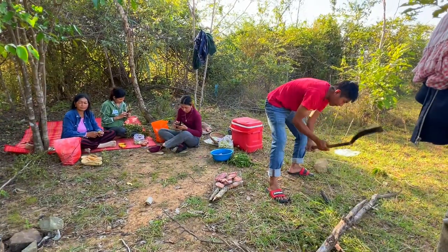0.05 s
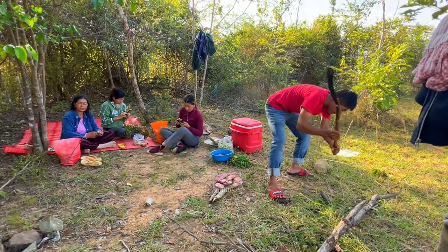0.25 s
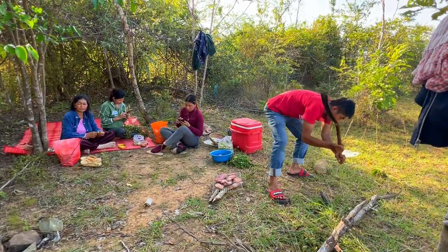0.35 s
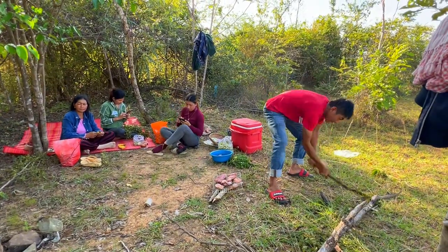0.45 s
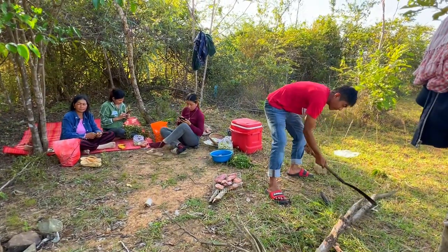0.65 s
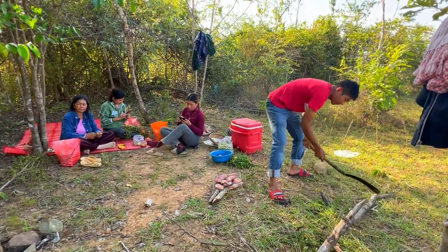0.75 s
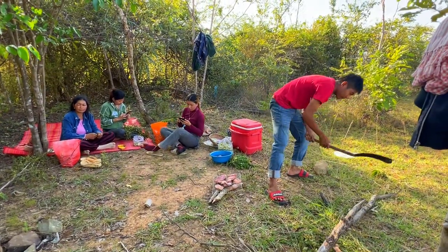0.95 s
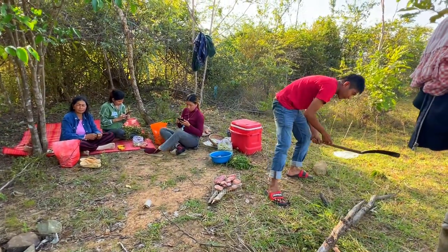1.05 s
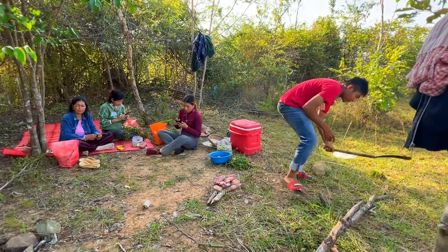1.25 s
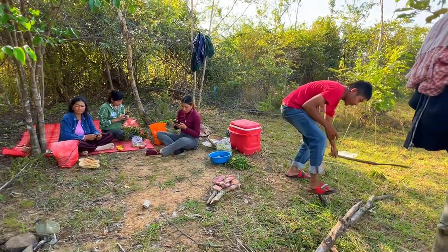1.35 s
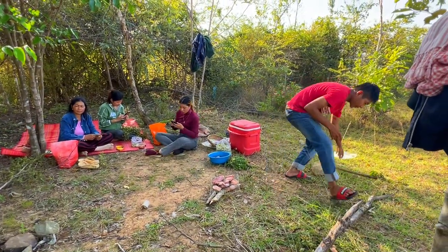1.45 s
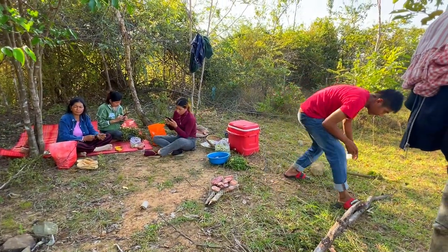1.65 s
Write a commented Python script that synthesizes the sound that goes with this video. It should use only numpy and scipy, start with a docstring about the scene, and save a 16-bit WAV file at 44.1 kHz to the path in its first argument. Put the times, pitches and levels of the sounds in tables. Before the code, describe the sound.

One hard blade chop splits dry wood on the ground, followed by crackling twigs and soft knocks

```python
"""Forest floor: a machete chops once into a dry branch, which cracks, splinters and thumps the ground.
The blade is worked free, twigs snap in the leaf litter, and a foot steps up and knocks the wood.
Behind are a low wind rumble, faint hiss and thin, high insect chirps.
Wood, blade and ground are damped sines; tearing, leaves and wind are coloured noise; chirps are
noise-modulated tones."""
import sys
import numpy as np
from scipy import signal
from scipy.fft import rfft, irfft, next_fast_len
from scipy.io import wavfile

SR = 44100
rng = np.random.default_rng(int(sys.argv[2]) if len(sys.argv) > 2 else 0)


def store_wav(level_fs):
    """Save 16-bit WAV to argv[1]."""
    pcm = np.round(np.clip(np.atleast_2d(level_fs), -1, 1) * 32767)
    wavfile.write(sys.argv[1], SR, pcm.T.astype(np.int16))


N = 74970


def amp(db):
    """Decibels to gain."""
    return 10 ** (np.asarray(db) / 20)


def unit(x):
    """Scale to rms 1."""
    return x / np.sqrt(np.mean(x ** 2) + 1e-20)


def along(points, hz):
    """Interpolate (Hz, value) points on a log frequency axis."""
    point_hz, value = np.transpose(points)
    return np.interp(np.log(hz + 1), np.log(point_hz + 1), value)


def curve(rows):
    """(s, value) rows to one value per sample."""
    return np.interp(np.arange(N) / SR, *np.transpose(rows))


def since(start_s):
    """Seconds since start_s, zero before."""
    return np.maximum(np.arange(N) / SR - start_s, 0)


def fade(t, t60_s, rise_s):
    """Quick rise, exponential decay."""
    return np.exp(-np.log(1000) * t / t60_s) * (1 - np.exp(-t / rise_s))


def filtered(x, response):
    """Multiply the spectrum of x by a function of frequency."""
    size = next_fast_len(N + SR // 4)
    hz = np.fft.rfftfreq(size, 1 / SR)
    return irfft(rfft(x, size) * response(hz), size)[..., :N]


# left-right likeness of noise: freq_hz, correlation
LIKENESS = [(300, .99), (700, .96), (2000, .7), (4000, .5), (8000, .3), (14000, .1)]


def noise(spectrum, grain_db=0):
    """Coloured stereo noise of rms 1; grain_db clumps it into grains under a millisecond long."""
    grains = amp(grain_db * np.repeat(rng.standard_normal(N // 20 + 1), 20)[:N])

    def mid_side_response(hz):
        angle = np.arccos(np.clip(along(LIKENESS, hz), -1, 1)) / 2
        return amp(along(spectrum, hz)) * [np.cos(angle), np.sin(angle)]

    mid, side = filtered(rng.standard_normal((2, N)) * grains, mid_side_response)
    return unit(np.array([mid + side, mid - side]))


def ring(start_s, modes, rise_s):
    """Damped modes (pitch_hz, level_db, t60_s) struck at start_s, cut off after 0.25 s."""
    out, start = np.zeros(N), int(start_s * SR)
    t = since(start_s)[start:start + SR // 4]
    out[start:start + len(t)] = sum(
        amp(db) * fade(t, t60_s, rise_s) * np.sin(2 * np.pi * hz * t) for hz, db, t60_s in modes)
    return out


# wind rumble level: time_s, level_db
WIND_LEVEL = [(0, -43), (.07, -44.5), (.13, -60.5), (.2, -54), (.27, -49.5), (.34, -68), (.39, -53.5),
              (.43, -44), (.52, -61.5), (.61, -55.5), (.67, -63), (.8, -58.5), (.87, -44.5), (.95, -48),
              (1.03, -56), (1.12, -58), (1.17, -46.5), (1.25, -44.5), (1.33, -59.5), (1.42, -43),
              (1.47, -49), (1.53, -44.5), (1.62, -51.5), (1.7, -58.5)]
# wind rumble colour: freq_hz, relative_db
RUMBLE_COLOUR = [(20, -26), (38, -20), (52, -1.5), (62, 1.5), (76, -10.5), (105, -20), (140, -32),
                 (250, -36), (600, -58.5), (2000, -94.5)]
# steady upper rumble colour: freq_hz, relative_db
BUFFET_COLOUR = [(30, -39), (80, -12.5), (105, 1.5), (130, -13), (200, -22.5), (500, -46.5), (2000, -90)]
# forest hiss colour: freq_hz, relative_db
HISS_COLOUR = [(100, 8), (300, 3), (900, -3), (2200, -4), (4500, -11), (8000, -9), (15000, -28.5)]
BUFFET_DB, HISS_DB = -60, -69.5


def background():
    """Varying low wind rumble over a steady upper rumble and hiss, all coloured noise."""
    rumble = noise(RUMBLE_COLOUR) * amp(curve(WIND_LEVEL))
    return rumble + noise(BUFFET_COLOUR) * amp(BUFFET_DB) + noise(HISS_COLOUR) * amp(HISS_DB)


# leaf rustle level: time_s, level_db
RUSTLE_LEVEL = [(0, -57), (.04, -66.5), (.09, -70), (.13, -64.5), (.41, -56.5), (.44, -50.5), (.495, -46.5),
                (.525, -60.5), (.69, -67.5), (.75, -58), (.79, -62.5), (.85, -62.5), (.882, -41),
                (.91, -59.5), (.97, -74.5), (1.085, -73.5), (1.098, -48), (1.17, -55.5), (1.212, -43),
                (1.245, -55), (1.31, -61), (1.385, -55.5), (1.44, -61), (1.5, -58), (1.56, -65.5),
                (1.7, -81)]
# leaf colour: freq_hz, relative_db
LEAF_COLOUR = [(150, -0.5), (400, -5.5), (900, -3.5), (1600, -1), (2600, -3), (4500, -7), (8000, -3),
               (12000, -11), (16000, -11)]
# sole on dry grass, colour: freq_hz, relative_db
SCUFF_COLOUR = [(1000, -34), (4000, -5), (8000, -7), (12000, 0.5), (16000, -7)]
SCUFF_START_S, SCUFF_DB, SCUFF_T60_S = 1.094, -46.5, 0.97


def litter():
    """Dry leaves crackle under blade and feet as grainy noise; a sole brushes the grass and decays."""
    scuff_fade = fade(since(SCUFF_START_S), SCUFF_T60_S, rise_s=0.0052)
    scuff = noise(SCUFF_COLOUR, grain_db=5) * amp(SCUFF_DB) * scuff_fade
    return noise(LEAF_COLOUR, grain_db=4.5) * amp(curve(RUSTLE_LEVEL)) + scuff


# snapping twigs and bark: start_s, level_db, pitch_hz, treble_db (tick relative to snap)
TWIG_SNAPS = [(.007, -36, 1930, -19.5), (0.084, -43.5, 2270, -32), (.1, -43, 1900, -22),
              (0.1518, -37, 2230, -13), (.2918, -31, 2470, 3.5), (0.3122, -32, 2535, 3.5),
              (0.3363, -36.5, 2320, 0), (0.364, -34.5, 2410, -12), (0.4367, -32, 2310, -17),
              (.468, -36, 2620, -7), (.492, -30, 2500, -2.5), (0.496, -33, 2640, -9),
              (0.5442, -37.5, 2300, -17), (0.558, -42.5, 2150, -24.5), (0.6621, -44, 2117, -14.5),
              (.736, -42, 2970, -4.5), (0.7483, -32.5, 2380, -11.5), (0.763, -42, 4410, -18),
              (.809, -34, 2770, -36), (.845, -36.5, 2360, -29), (0.859, -44.5, 2270, 6),
              (0.871, -31, 2380, -11), (0.8782, -29.5, 2560, -6), (1.095, -33.5, 1684, -0.5),
              (1.1365, -35.5, 1740, 1.5), (1.1486, -41.5, 1980, 8), (1.2119, -32, 2780, 2.5),
              (1.3254, -55.5, 1500, 14), (1.3526, -57.5, 2470, 21), (1.523, -31.5, 2420, -12.5)]
# snap colour: pitch_multiple, relative_db
TWIG_COLOUR = [(.3, -24.5), (.6, -6), (.95, 1.5), (1.3, -4), (2, -7.5), (3, -24.5), (6, -49)]
BODY_T60_S, TICK_T60_S = 0.0083, .012
PING_DB, PING_T60_S = -6, .011


def twigs():
    """Dry twigs snap: a woody noise burst, a brief ring and a bright tick."""
    tick = noise([(200, -6), (1500, -5), (6000, 4.5), (15000, 2.5)])
    out = np.zeros((2, N))
    for start_s, level_db, pitch_hz, treble_db in TWIG_SNAPS:
        t = since(start_s)
        colour = [(pitch_hz * ratio, db) for ratio, db in TWIG_COLOUR]
        body = noise(colour) * fade(t, BODY_T60_S, rise_s=0.00037)
        ping = ring(start_s, [(pitch_hz, PING_DB, PING_T60_S)], rise_s=0.00013)
        bright = tick * amp(treble_db) * fade(t, TICK_T60_S, rise_s=0.00027)
        out += amp(level_db) * (body + ping + bright)
    return out


# insect chirps: start_s, level_db (before CHIRP_GAIN_DB)
INSECT_CHIRPS = [(0.048, -61), (.58, -61), (.71, -58.5), (.845, -74), (.97, -62), (1.367, -62), (1.5, -62),
                 (1.625, -64.5)]
CHIRP_GAIN_DB, CHIRP_S = 2, 0.061
CHIRP_START_HZ, CHIRP_WIDTH_HZ, CHIRP_FALL_HZ_PER_S = 7520, 190, 4300


def insects():
    """Thin chirps that sag in pitch, roughened by slow noise multiplying the tone."""
    out = np.zeros((2, N))
    rasp = noise([(20, 0), (CHIRP_WIDTH_HZ, 0), (2 * CHIRP_WIDTH_HZ, -20), (2000, -80)])
    for start_s, level_db in INSECT_CHIRPS:
        t = since(start_s)
        swell = np.sin(np.pi * np.minimum(t / CHIRP_S, 1)) ** 0.94
        cycles = CHIRP_START_HZ * t - CHIRP_FALL_HZ_PER_S * t * t / 2
        out += amp(level_db + CHIRP_GAIN_DB) * swell * rasp * np.sin(2 * np.pi * cycles)
    return out


# bite, then the branch jolting on the ground:
# start_s, ring_db, crack_db, pitch_ratio, tilt_db_per_octave (about 1 kHz)
CHOP_BLOWS = [(0.2113, -7.5, -15, 1.023, 2), (.2143, -11.5, -25.5, .98, -3.5),
              (0.2267, -25, -29, 0.94, -3.5), (.2305, -22, -30.5, 0.84, 0.5), (.2465, -22, -39, 1.06, 3),
              (0.2582, -28.5, -38.5, 0.89, 0), (0.2655, -29, -37.5, 1.0, 1.5),
              (.275, -31.5, -46.5, 0.89, -3)]
# branch modes: pitch_hz, relative_db, t60_s
BRANCH_MODES = [(185, -21, 0.055), (230, -16, 0.037), (298, -18.5, .09), (425.7, -19, .09),
                (673, -6.5, .03), (980, 2.5, 0.018), (1098, 0.5, 0.023), (1347, -3.5, .025),
                (1483, 4.5, .018), (1821, -6.5, .03), (2040, -13.5, 0.055), (2723, -6.5, 0.021),
                (3740, -9.5, 0.023), (4270, -18, 0.039)]
# crack colour: freq_hz, relative_db
CRACK_COLOUR = [(200, -11.5), (900, -6.5), (1600, -7), (2800, -2), (4000, -6.5), (5000, -10), (7000, -6),
                (12000, -15.5), (16000, -21.5)]
# tearing fibres, colour: freq_hz, relative_db
SPLINTER_COLOUR = [(80, -19), (200, -6.5), (500, -7), (1000, -9), (1500, -9.5), (2400, -13), (4000, -16),
                   (8500, -17), (12000, -20), (15500, -26.5)]
# blade's faint ring after the bite: pitch_hz, level_db, t60_s
BLADE_MODES = [(1520, -40, 0.24), (2297, -41.5, .3), (2545, -38.5, .25), (2950, -44.5, .2),
               (8876, -48.5, .2), (11515, -48, .2)]
# ground gives: start_s, pitch_hz, level_db, t60_s
GROUND_THUMPS = [(0.2137, 185, -19, 0.046), (.226, 400, -22.5, 0.052), (.234, 105, -22.5, 0.098),
                 (.265, 75.7, -32.5, .09)]
CRACK_T60_S, CRACK_RISE_S = .018, .0008
SPLINTER_DB, SPLINTER_T60_S, SPLINTER_RISE_S = -20.5, 0.21, 0.0026
BITE_S = CHOP_BLOWS[0][0]


def chop():
    """Each blow rings and cracks the branch; fibres tear after the bite, blade rings, ground thumps."""
    splinter_fade = fade(since(BITE_S), SPLINTER_T60_S, SPLINTER_RISE_S)
    out = noise(SPLINTER_COLOUR, grain_db=4.5) * amp(SPLINTER_DB) * splinter_fade
    crack = noise(CRACK_COLOUR, grain_db=2)
    for start_s, ring_db, crack_db, pitch_ratio, tilt in CHOP_BLOWS:
        modes = [(hz * pitch_ratio, db + ring_db + tilt * np.log2(hz / 1000), t60_s)
                 for hz, db, t60_s in BRANCH_MODES]
        out += ring(start_s, modes, rise_s=.0005)
        out += crack * amp(crack_db) * fade(since(start_s), CRACK_T60_S, CRACK_RISE_S)
    blade = ring(BITE_S, BLADE_MODES, rise_s=.001)
    thumps = sum(ring(start_s, [mode], rise_s=.002) for start_s, *mode in GROUND_THUMPS)
    return out + blade + thumps


# echo decay: freq_hz, t60_s
ECHO_DECAY = [(150, .4), (600, 0.52), (2500, 0.86), (7000, .65), (15000, .55)]
# echo colour: freq_hz, relative_db
ECHO_COLOUR = [(100, -3), (300, 6.5), (900, -3.5), (2500, -7.5), (4500, -8.5), (8000, -5), (15000, -16)]
ECHO_DB = -36


def trees():
    """The chop scatters back from the trees: noise from the bite on, each band dying at its own speed."""
    hz, t, bands = signal.stft(noise(ECHO_COLOUR), SR, nperseg=256)
    t60_s = along(ECHO_DECAY, hz)[:, None]
    bands = bands * fade(np.maximum(t - BITE_S, 0), t60_s, rise_s=.015)
    return amp(ECHO_DB) * signal.istft(bands, SR, nperseg=256)[1][:, :N]


# light knocks on the branch: start_s, level_db, tilt_db_per_octave (about 1 kHz), low_cut_hz
BRANCH_KNOCKS = [(0.494, -43.5, 4, 498), (0.8805, -39.5, -1.5, 280), (.884, -44.5, -2, 280),
                 (1.1028, -51, 0, 300), (1.193, -35.5, -2, 120), (1.378, -51.5, -4, 400)]
# foot shifts and lands: start_s, pitch_hz, level_db, t60_s (rows past the end are silent)
FOOT_THUMPS = [(1.1945, 443, -29, .03), (1.196, 259, -30, 0.03), (1.195, 137, -37.5, .07),
               (1.193, 830, -47, 0.11), (3.4, 71, -34, .17), (1.3, 123, -47, 0.13)]
# loose soil settles under branch and foot: start_s, level_db, t60_s
SOIL_SETTLES = [(0.269, -46.5, 0.55), (1.097, -56, 0.22), (1.203, -45, 0.28)]
# soil colour: freq_hz, relative_db
SOIL_COLOUR = [(60, -7.5), (130, 3.5), (300, -5), (550, -6.5), (900, -15), (2500, -36)]


def knocks():
    """Light touches ring the branch with its low modes cut; a foot lands beside it and soil settles."""
    out = sum(ring(start_s, [mode], rise_s=0.00052) for start_s, *mode in FOOT_THUMPS)
    for start_s, level_db, tilt, low_cut_hz in BRANCH_KNOCKS:
        modes = []
        for hz, db, t60_s in BRANCH_MODES:
            cut_db = 10 * np.log10(1 + (low_cut_hz / hz) ** 6)
            modes.append((hz, level_db + db + tilt * np.log2(hz / 1000) - cut_db, t60_s))
        out = out + ring(start_s, modes, rise_s=0.00081)
    settling = sum(amp(db) * fade(since(start_s), t60_s, rise_s=.006)
                   for start_s, db, t60_s in SOIL_SETTLES)
    return out + noise(SOIL_COLOUR) * settling


# phase between ports: freq_hz, left_lead_rad
LEFT_LEAD = [(400, 0), (700, -.35), (1100, -.85), (2000, -.95), (3000, 0), (4500, 1.0), (8000, .5),
             (14000, 0)]
# level between ports: freq_hz, left_minus_right_db
LEFT_BALANCE = [(60, 1), (500, 1), (1100, -3.5), (1700, 1), (2600, 7), (4000, 0), (8000, -.5)]


def scene():
    """The work is off to one side, so it reaches the two ports with different phase and level."""
    sides = np.array([[.5], [-.5]])  # half of each difference per port

    def port_response(hz):
        return np.exp(1j * sides * along(LEFT_LEAD, hz)) * amp(sides * along(LEFT_BALANCE, hz))

    near = filtered(chop() + twigs() + knocks() + litter(), port_response)
    far = trees() + insects() + background()
    return near + far * amp(sides * 1.5)  # left 1.5 dB over right


# treble peaks and notches of the ports: freq_hz, gain_db
PORT_TREBLE = [(8000, -0.5), (9200, 2.5), (9900, -11), (10500, -13), (11300, 5), (12700, -0.5),
               (13400, -15.5), (14100, 0.5), (14800, 1.5), (15700, 3)]
CLIP_TOP, TOP_HZ = 1, 16100


def record(dry):
    """Soft overload, the ports' treble peaks and notches, and the band limit."""
    held = dry / (1 + (dry / CLIP_TOP) ** 6) ** (1 / 6)
    return filtered(held, lambda hz: amp(along(PORT_TREBLE, hz)) / (1 + (hz / TOP_HZ) ** 160))


dry = scene()
out = record(dry)
store_wav(out)
```